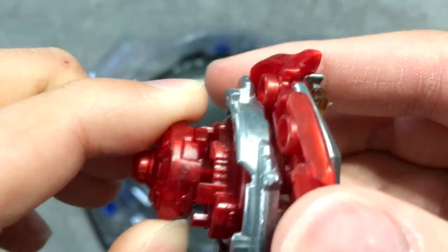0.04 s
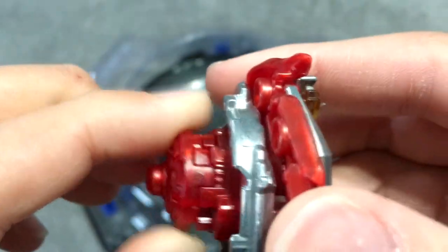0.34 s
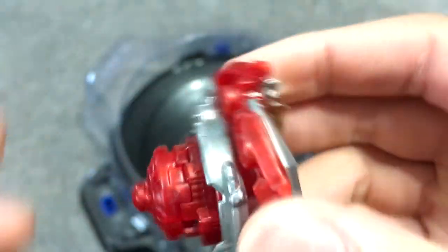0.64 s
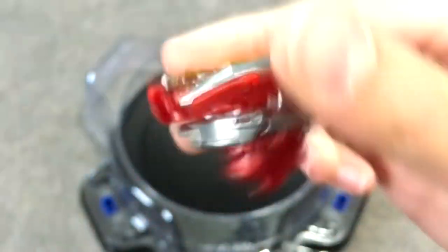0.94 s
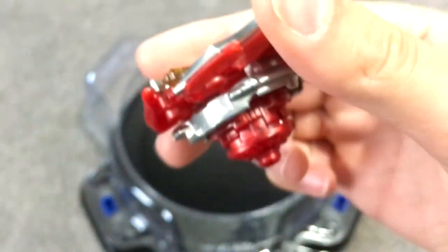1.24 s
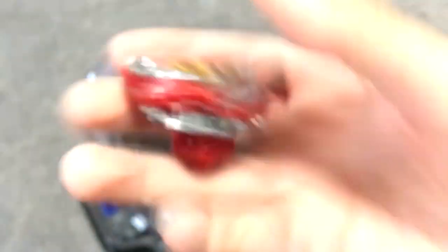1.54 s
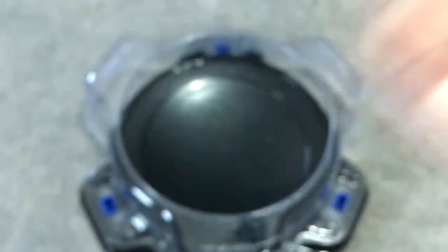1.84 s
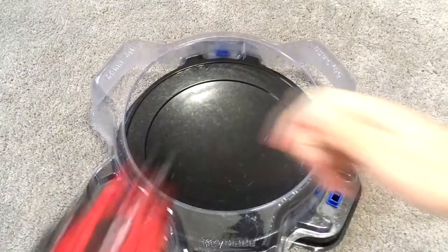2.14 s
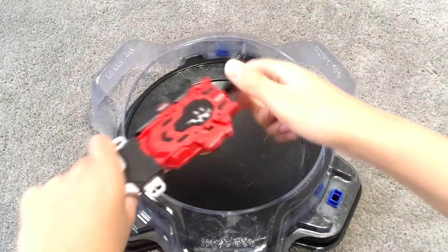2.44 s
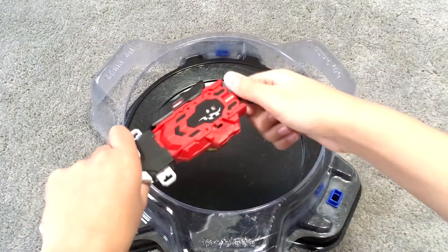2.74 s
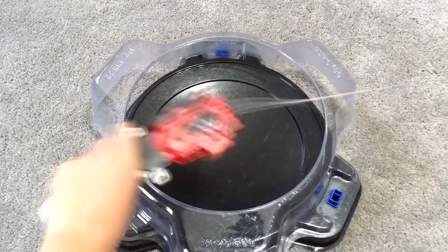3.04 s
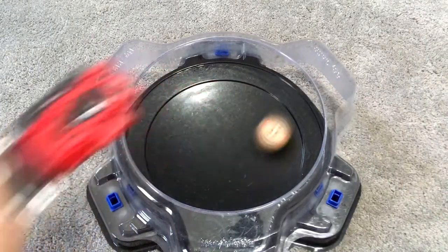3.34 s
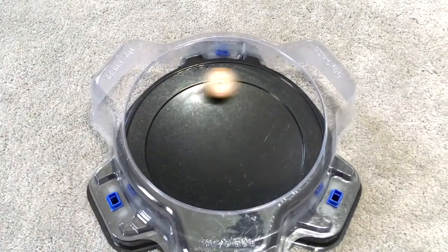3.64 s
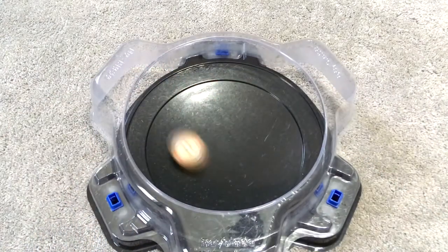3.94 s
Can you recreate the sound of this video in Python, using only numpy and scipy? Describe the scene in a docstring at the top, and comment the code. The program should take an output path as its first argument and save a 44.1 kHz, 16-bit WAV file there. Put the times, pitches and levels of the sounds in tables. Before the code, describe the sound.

A spinning top clatters and rumbles around a plastic dish. First its parts snap together close to the microphone and click onto a launcher, then a pulled cord whines and the top drops in, in a quiet room.

```python
"""A spinning toy top drops into a plastic dish, strikes the wall and circles with a hollow rumble:
its tip excites the modes of the dish and its imbalance drives a hum. Before that, in a carpeted room,
the top is snapped together close by and clicked onto a string launcher. The cord rips the gears up to
speed, their tooth clicks merging into a whine, stops with a knock and whirrs back in as the top runs."""
import sys
import numpy as np
from scipy import signal
from scipy.fft import rfft, irfft
from scipy.io import wavfile

SR = 44100
rng = np.random.default_rng(int(sys.argv[2]) if len(sys.argv) > 2 else 0)


def inscribe(sig):
    """Save sig as 16-bit PCM at rate SR to the path in sys.argv[1].

    A 1-D sig is mono; a 2-D sig holds one channel per row.
    Samples are clipped to [-1, 1] before scaling.
    """
    pcm = np.round(np.clip(np.atleast_2d(sig).T, -1, 1) * 32767)
    wavfile.write(sys.argv[1], SR, pcm.astype(np.int16))


N = 176400
T = np.arange(N) / SR
BOOM_HZ, TREBLE_HZ, TOP_OCTAVE_HZ = 250, 4376, 8900  # band edges

# modes of the dish floor: f/Hz, level/dB, t60/s
DISH_MODES = [(105.1, -13, 0.58), (138.7, -6.5, 0.21), (166, -18, 0.15), (196.3, 2.5, 0.087),
              (216.3, -10.5, 0.3), (284.7, -5.5, 0.065), (355, -2, 0.043), (445, 1, 0.02),
              (551.5, -3.5, 0.043), (628, -14.5, 0.12), (770, -5, 0.021)]
# the tip circling the dish: t/s, rumble level/dB, scrape level/dB
TIP_LEVELS = [(3.18, -57, -33), (3.35, -32, -64), (3.6, -31, -38), (3.72, -40.5, -35), (3.87, -33, -38),
              (4.0, -33.5, -45)]
# spectrum of the launcher's plastic: f/Hz, level/dB
LAUNCHER_SPECTRUM = [(100, -17.5), (650, -25.5), (1100, 3.5), (1600, 1.5), (2300, -3.5), (3200, 1),
                     (4900, -7.5), (6500, 2.5), (8000, -3.5), (10000, -2), (15500, -11)]


def wall_strikes():
    """Impact excitation: the spinning top hits the dish wall, whose dense modes die quickly."""
    # t/s, middle level/dB, treble level/dB
    strikes = [(3.1605, -12.5, -11), (3.3105, -17.5, -11.5), (3.349, -33, -17.5), (3.3735, -17.5, -12.5),
               (3.435, -23.5, -22.5), (3.4612, -17.5, -17), (3.471, -19.5, -29.5), (3.518, -26, -26.5),
               (3.5575, -13, -14.5), (3.5995, -25.5, -21.5), (3.6375, -21.5, -31), (3.650, -21, -29),
               (3.7672, -10, -14.5), (3.775, -20, -16.5), (3.8605, -18.5, -21), (3.867, -24, -35),
               (3.9715, -26, -29.5)]
    # spectrum of the wall: f/Hz, level/dB
    wall_spectrum = [(150, -33), (800, -15.5), (1230, 7), (1750, 0), (3000, 1), (4700, -6.5), (6500, -0.5),
                     (9000, -3.5), (15500, -7)]
    return plastic(strikes, wall_spectrum, t60=.032, tail_db=-12.5, tail_t60=.064, crack=3.1)


def floor_thumps(spread_octaves=.37):
    """Modal response: blows set the dish floor booming; the point of impact selects the higher modes."""
    # t/s, boom level/dB, knock level/dB, knock centre f/Hz
    blows = [(3.1615, -8, -11, 278), (3.308, -19.5, -10.5, 450), (3.353, -23.5, -18, 326),
             (3.416, -26, -16.5, 357), (3.458, -27.5, -10.5, 483), (3.516, -24.5, -11.5, 710),
             (3.971, -22, -25, 400)]
    out, boom = 0, clicks(blows)
    for k, (hz, db, t60) in enumerate(DISH_MODES):
        knock = clicks([(s, knock_db - 3 * (np.log2(hz / centre_hz) / spread_octaves) ** 2)
                        for s, _, knock_db, centre_hz in blows])
        out += amp(db) * ring(boom if hz < BOOM_HZ else (-1) ** k * knock, hz, t60)
    return out


def rolling(lands_s=3.16, bank_s=3.62, spin_hz=110, sag_hz_per_s=10):
    """Forced vibration: bumps under the tip ring the dish, and imbalance shakes it once per turn."""
    bumps = grit(per_s=630, spread_db=6)
    rumble = unit(sum((-1) ** k * amp(db) * ring(bumps, hz, t60) * (1 if hz > BOOM_HZ else .42)
                      for k, (hz, db, t60) in enumerate(DISH_MODES)))
    turn_hz = spin_hz - sag_hz_per_s * (T - lands_s) + 2 * drift(19.3)
    angle = 2 * np.pi * np.cumsum(turn_hz) / SR
    hum = 0
    # the octave joins in once the top rides the bank of the dish
    for harmonic, from_s, db in ((1, lands_s, -36 + 2 * drift(15)), (2, bank_s, -36.5 + 4 * drift(17))):
        onset = np.clip((T - from_s) / .03, 0, 1)
        hum += onset * amp(db) * unit(np.sin(harmonic * angle))
    return level(TIP_LEVELS) * rumble + hum


def scrape():
    """Sliding friction: the tip skids over the dish in a stream of uneven micro-impacts."""
    # spectrum of the skid: f/Hz, level/dB
    skid_spectrum = [(150, -26), (900, -6.5), (1250, 1), (3200, 1.5), (4700, -4), (6600, -1), (10000, -8.5),
                     (16000, -11.5)]
    grains = bursts(grit(per_s=2800, spread_db=3.7), t60=.007)
    return colour(level(TIP_LEVELS, axis=2) * grains, skid_spectrum)


def gear_rip(jitter=.04, teeth_db=-6, rasp_db=-3):
    """Gear meshing: tooth impacts fuse into a rising whine at the mesh frequency, over the cord's rasp."""
    # rate of tooth impacts: t/s, f/Hz
    mesh_curve = [(2.85, 83.5), (2.9, 170.5), (2.92, 301.5), (2.945, 540), (2.965, 996), (2.98, 1370.5),
                  (3.015, 2101), (3.04, 2254), (3.08, 1912.5)]
    # strength of the pull: t/s, level/dB
    pull = [(2.852, -39.5), (2.898, -47), (2.91, -36.5), (2.967, -15.5), (3.025, -15), (3.054, -11),
            (3.08, -23), (3.1, -68)]
    mesh_hz = np.interp(T, *np.transpose(mesh_curve))
    driven = np.clip((3.04 - T) / .043, 0, 1)  # once the gears stop gaining speed they chatter loosely
    waver = jitter * (4 - 3.4 * driven) * drift(600)
    cycles = np.cumsum(mesh_hz * (1 + waver)) / SR
    teeth = np.diff(np.floor(cycles), prepend=0) * np.sqrt(SR / mesh_hz)
    teeth *= amp(5.16 * noise() + 2.5)  # no two impacts are equally strong
    housing = .4 * teeth + .9 * bursts(teeth, t60=.008)
    body = colour(amp(teeth_db) * housing + amp(rasp_db) * noise(), LAUNCHER_SPECTRUM)
    whine = sum(amp(db) * np.sin(2 * np.pi * k * cycles) for k, db in ((1, -5), (2, -12), (3, -12)))
    envelope = level(pull) * (T < pull[-1][0])
    return envelope * (band(body, 120, "high") + driven * band(whine, 990, "high", order=6))


def cord_stop(crack_db=-9):
    """Impulse response: the cord reaches its end and jolts the launcher's frame, which cracks and rings."""
    # t/s, level/dB
    jolts = [(3.0845, -14), (3.0875, -7), (3.091, -16.5)]
    # f/Hz, level/dB, t60/s
    frame_modes = [(295.6, -26.5, 0.35), (520, 3, 0.024), (900, 6, 0.012), (1543, -0.5, 0.032),
                   (2446, 4.5, 0.016)]
    blows = clicks(jolts)
    frame = sum((-1) ** k * amp(db) * ring(blows, hz, t60) for k, (hz, db, t60) in enumerate(frame_modes))
    return frame + amp(crack_db) * band(noise() * dying(blows, .07), 6600, "low", order=1)


def rewind():
    """Shot noise: the spring reels the cord in, and many tiny contacts add up to a fine rattle."""
    # strength of the rattle: t/s, level/dB
    envelope = [(3.1, -36.5), (3.28, -29), (3.34, -25.5), (3.43, -34), (3.6, -54)]
    grains = bursts(grit(per_s=3000, spread_db=3), t60=.005)
    return band(colour(level(envelope) * grains, LAUNCHER_SPECTRUM), 13000, "low", order=1)


def handling(housing_hz=1325, housing_db=-12):
    """Resonance: latching the top on and gripping the launcher excite its hollow housing."""
    # t/s, middle level/dB, treble level/dB
    latches = [(2.129, -43, -67), (2.4005, -38.5, -28), (2.472, -35, -40), (2.506, -47, -47),
               (2.530, -39, -50), (2.583, -52.5, -46.5), (2.632, -47, -71)]
    # the launcher slides in the hand: centre t/s, width/s, level/dB
    grips = [(2.165, 0.064, -69.5), (2.471, 0.0063, -48), (2.765, 0.02, -59)]
    touch = plastic(latches, LAUNCHER_SPECTRUM, t60=.024, tail_db=-11.5, tail_t60=.041,
                    crack=4.2, lead_db=-17)
    touch += sliding(grips, LAUNCHER_SPECTRUM)
    return touch + amp(housing_db) * np.std(touch) * unit(ring(touch, housing_hz, t60=.027))


def assembly(catch_db=-.5):
    """Impact and friction: the top's parts snap home with ringing catches, amid taps, rubs and a scuff."""
    # t/s, middle level/dB, treble level/dB, top-octave level/dB, catch f/Hz
    snaps = [(.098, -32.5, -33.5, -38, 2330), (.101, -41.5, -27, -27.5, 4970), (.1178, -20, -8, -5.5, 5180),
             (0.777, -36, -38, -49, 4380), (1.532, -30.5, -28, -31, 5990), (1.543, -23.5, -19, -16, 6060),
             (1.602, -33, -31.5, -29, 6050), (1.607, -42, -35, -42, 7440), (1.6152, -18.5, -13, -20, 6170),
             (1.645, -34, -38, -35.5, 2400), (1.6506, -21.5, -15, -28, 6670)]
    # spectrum of the top's plastic: f/Hz, level/dB
    top_spectrum = [(300, -14), (800, -14), (1300, -7), (2200, -2), (4000, -6), (6300, 0.5), (8000, -3),
                    (11500, -2.5), (16000, -5)]
    # knocks on its body: t/s, level/dB, f/Hz, t60/s
    taps = [(.1185, -36, 430, .012), (1.807, -43.5, 2120, 0.011)]
    # fingers slide over it: centre t/s, width/s, level/dB
    rubs = [(.745, 0.035, -61)]
    # spectrum of the finger friction: f/Hz, level/dB
    rub_spectrum = [(5000, -13), (13000, 4), (16000, -16)]
    # a part scuffs in its seat: centre t/s, width/s, level/dB
    scuffs = [(.403, 0.0054, -46.5)]
    out = plastic([row[:-1] for row in snaps], top_spectrum, t60=.013, tail_db=-28, tail_t60=.05,
                  crack=2.5, lead_db=-17)
    for s, _, treble_db, _, hz in snaps:
        catch = ring(clicks([(s, treble_db + catch_db)]), hz, t60=.004)
        out += band(catch, hz / 2, "high")
    out += sum(ring(clicks([(s, db)]), hz, t60) for s, db, hz, t60 in taps)
    return out + sliding(rubs, rub_spectrum) + sliding(scuffs, top_spectrum)


def disc_clinks(split_hz=62):
    """Mode splitting: the top's metal disc is not quite round, so each mode beats with a weaker twin."""
    # t/s, level/dB, time until a finger damps the disc/s
    hits = [(0.776, -50, .07), (1.544, -33, 0.04)]
    # f/Hz, level/dB, t60/s
    disc_modes = [(4250, -18, .14), (5905, 0, .085), (7564, -19, .1), (10140, -12, .2), (13160, -8, .14)]
    out = 0
    for s, db, free_s in hits:
        hit = clicks([(s, db)])
        damping = np.exp(-np.maximum(T - s - free_s, 0) / .02)
        for hz, mode_db, t60 in disc_modes:
            out += damping * amp(mode_db) * (ring(hit, hz, t60) + .5 * ring(hit, hz + split_hz, t60 / 2))
    return out


def room(x, low_t60=.35, treble_t60=.11):
    """Reverberation: a diffuse tail decays exponentially, with the treble absorbed sooner."""
    tail = sum(band(noise(), TREBLE_HZ, kind) * np.exp(-np.log(1000) * T / t60)
               for kind, t60 in (("low", low_t60), ("high", treble_t60)))
    tail = band(tail * (T > .005), 140, "high")[:SR]
    return signal.fftconvolve(x, tail / np.linalg.norm(tail))[:N]


def background(rumble_db=-57, hiss_db=-62):
    """Broadband noise: the room rumbles steadily, and a soft hiss briefly follows the first snaps."""
    # f/Hz, level/dB
    rumble_spectrum = [(25, 1), (84, 0), (149, -13), (260, -17), (600, -28), (2000, -34.5), (16000, -38.5)]
    # f/Hz, level/dB
    hiss_spectrum = [(300, 12), (1000, 2), (16000, -3)]
    rumble = amp(rumble_db) * colour(noise(), rumble_spectrum)
    return rumble + amp(hiss_db) * colour(noise(), hiss_spectrum) * (T > .12) * (T < .525)


def plastic(rows, spectrum, t60, tail_db, tail_t60, crack, lead_db=-np.inf, lead_t60=.022):
    """Modal overlap: after an optional rub, struck plastic cracks and rings as noise with two decays."""
    parts = []
    for axis in range(1, len(rows[0])):  # one column of levels per frequency band
        hit = clicks(rows, axis)
        lead = amp(lead_db) * dying(hit[::-1], lead_t60)[::-1]
        envelope = lead + dying(hit, t60) + amp(tail_db) * dying(hit, tail_t60)
        parts.append(crack * hit + noise() * envelope)
    out = parts[0]
    for hz, part in zip((TREBLE_HZ, TOP_OCTAVE_HZ), parts[1:]):
        out = band(out, hz, "low", order=4) + band(part, hz, "high", order=4)
    return colour(out, spectrum)


def sliding(rows, spectrum):
    """Friction noise in Gaussian swells."""
    swells = sum(amp(db) * np.exp(-.5 * ((T - s) / width) ** 2) for s, width, db in rows)
    return swells * colour(noise(), spectrum)


def grit(per_s, spread_db):
    """Poisson process of tiny contacts of uneven size, rms 1."""
    sizes = amp(spread_db * np.minimum(rng.exponential(1, N), 4)) * np.sign(noise())
    return unit(sizes * (rng.random(N) < per_s / SR))


def bursts(contacts, t60):
    """Incoherent sum: each contact rings a new spot as a noise burst; energy is conserved."""
    return noise() * np.sqrt(dying(contacts ** 2, t60 / 2) * 2 * np.log(1000) / (t60 * SR))


def ring(x, hz, t60):
    """Damped oscillator; a unit click rings at height 1."""
    r, w = amp(-60 / (t60 * SR)), 2 * np.pi * hz / SR
    return signal.lfilter([0, np.sin(w)], [1, -2 * r * np.cos(w), r * r], x + 1e-18)


def dying(x, t60):
    """Exponential decay after every click."""
    return signal.lfilter([1], [1, -np.exp(-np.log(1000) / (t60 * SR))], x + 1e-18)


def clicks(rows, axis=1):
    """One impulse per row, as strong as a column of dB."""
    out = np.zeros(N)
    for row in rows:
        out[min(int(row[0] * SR), N - 1)] += amp(row[axis])
    return out


def colour(x, points):
    """Minimum-phase filter with the given spectrum and unit power gain."""
    hz, db = np.transpose(points)
    grid_hz = np.maximum(np.arange(2049) * SR / 4096, 1)
    gain = amp(np.interp(np.log(grid_hz), np.log(hz), db))
    cepstrum = irfft(np.log(gain))
    half = len(cepstrum) // 2
    response = irfft(np.exp(rfft(2 * cepstrum[:half], 2 * half)))
    return signal.fftconvolve(x, response / np.linalg.norm(response))[:N]


def band(x, hz, kind, order=2):
    """Butterworth filter."""
    return signal.sosfilt(signal.butter(order, hz, kind, fs=SR, output="sos"), x + 1e-18)


def level(rows, axis=1):
    """Gain over time from a column of dB, silent before the first row and held after the last."""
    rows = np.array(rows)
    return amp(np.interp(T, rows[:, 0], rows[:, axis])) * (T >= rows[0, 0])


def drift(hz):
    """Random fluctuation below hz, rms 1."""
    return unit(band(noise(), hz, "low"))


def noise():
    """White noise."""
    return rng.standard_normal(N)


def amp(db):
    """Decibels to gain."""
    return 10 ** (np.asarray(db) / 20)


def unit(x):
    """Scale to rms 1."""
    return x / np.sqrt(np.mean(x ** 2) + 1e-20)


def scene():
    """Superposition: the hands are close and nearly dry; launcher and dish, further off, echo more."""
    near = assembly() + disc_clinks()
    far = wall_strikes() + scrape() + handling() + gear_rip() + cord_stop() + rewind()
    direct = near + far + floor_thumps() + rolling()
    return (direct + room(amp(-23) * near + amp(-13) * far) + background())[None]


def record(dry, low_cut_hz=60, high_cut_hz=16000):
    """Band limiting and saturation: the microphone drops deep bass, rounds peaks and cuts high treble."""
    rounded = .95 * np.tanh(band(dry, low_cut_hz, "high", order=3) / .95)
    return signal.sosfilt(signal.ellip(10, .2, 80, high_cut_hz, fs=SR, output="sos"), rounded)


dry = scene()
out = record(dry)
inscribe(out)
```